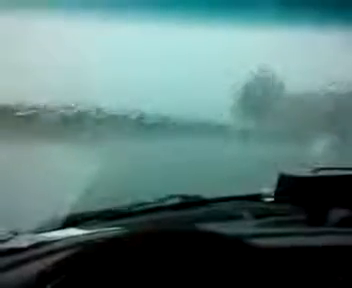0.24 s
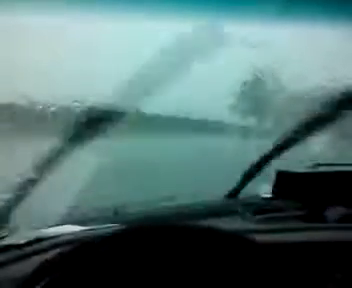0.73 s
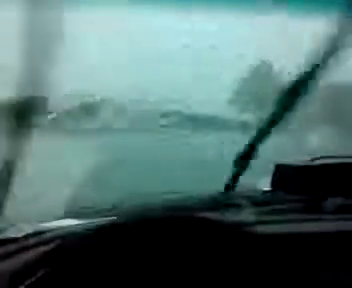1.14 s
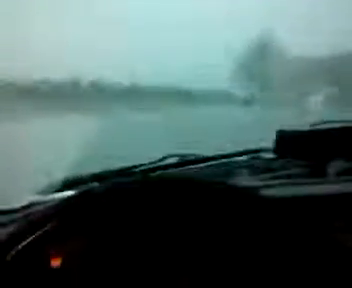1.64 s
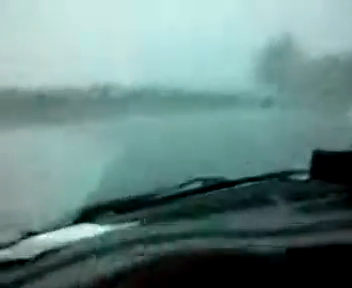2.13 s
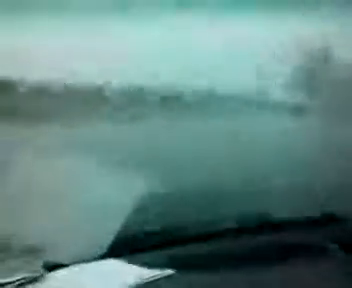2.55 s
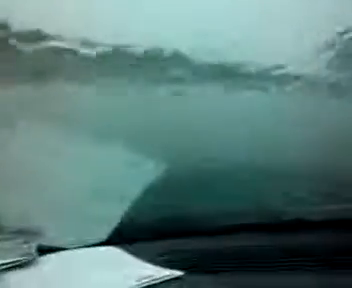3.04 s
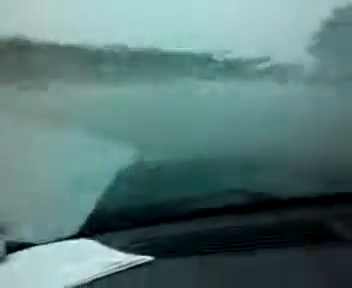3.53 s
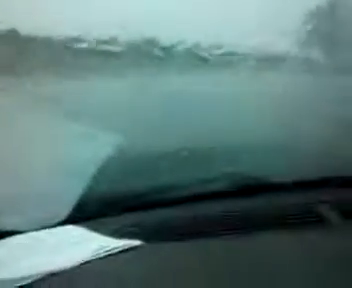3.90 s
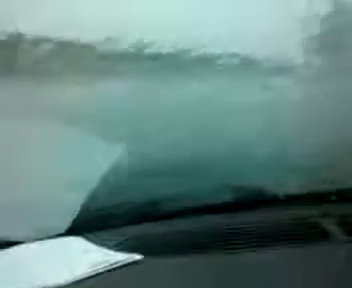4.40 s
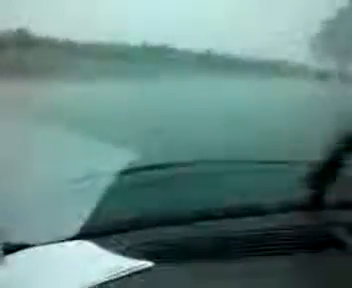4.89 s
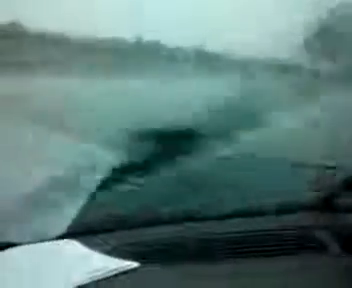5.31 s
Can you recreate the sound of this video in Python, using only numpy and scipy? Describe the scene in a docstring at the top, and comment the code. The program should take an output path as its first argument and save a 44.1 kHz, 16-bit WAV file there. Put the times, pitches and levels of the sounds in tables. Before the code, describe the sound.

Hail clatters on a car roof and windshield from the first instant, heard close from inside the cabin. A dense patter of small stones swells and dips with the gusts, giving hollow midrange knocks on the metal and sharper taps on the glass. Bigger stones land in quick clumps and make the panels ring very briefly. Single heavy stones crack through, notably around 0.1, 0.6 and 1.7 seconds and repeatedly between 2.5 and 3 seconds, the loudest overloading into bright ticks. Just after 3 seconds the hail eases briefly, with another burst near 3.6 seconds. From about 4 seconds low thumps of the car body stand out, strongest around 4.3 seconds, and the clatter runs on to the end at about 5.6 seconds. The sound has the narrow, slightly dull quality of a phone microphone with little treble.

```python
"""Hail on a parked car, heard from the cabin, close under roof and windshield, on a narrow-band phone mic.
From the start a dense patter swells with the gusts; bigger stones land in clumps and set panels ringing,
and single heavy stones crack, the loudest overloading the recorder into bright ticks.
Just after 3 s the hail eases briefly; from about 4 s low thumps of the car body stand out,
and the clatter runs on to the end."""
import sys
import numpy as np
from scipy import signal
from scipy.io import wavfile
from scipy.ndimage import uniform_filter1d

SR = 44100
rng = np.random.default_rng(int(sys.argv[2]) if len(sys.argv) > 2 else 0)


def bounce(signal):
    """Save signal as a 16-bit WAV file at the path given by the first command-line argument."""
    frames = np.transpose(np.atleast_2d(signal))
    limited = np.clip(frames, -1, 1)
    pcm = np.round(limited * 32767).astype(np.int16)
    wavfile.write(sys.argv[1], SR, pcm)


N = 244755

# Gusts driving the hail: t/s, roof level/dB, glass over roof/dB, body thump over roof/dB, roof ring f/Hz
GUSTS = [(0.0, -17, -10.5, -7, 632), (0.3, -18.5, -7.5, -6, 595), (0.6, -17.5, -6.5, -3.5, 763),
         (0.95, -16.5, -5.5, -6.5, 622), (1.3, -17.5, -9, -5.5, 650), (1.62, -18.5, -10, -9.5, 753),
         (2.0, -19, -10, -3.5, 590), (2.3, -19.5, -10, -10, 617), (2.55, -20.5, -2, -6, 648),
         (3.0, -17.5, -8, -11.5, 570), (3.2, -28, -6, 3.5, 570), (3.351, -21, -10, -8, 650),
         (3.54, -24.5, -10.5, -5, 604), (3.72, -15, -9, -9, 516), (4.05, -23.5, -3, -4.5, 590),
         (4.42, -17, -1.5, -2, 617), (4.68, -22.5, -11, 5.5, 563), (4.85, -19.5, -10.5, -10, 707),
         (5.2, -18.5, -8.5, -7, 556), (5.55, -18.5, -5.5, -8, 687)]


def heavy_stones(swing, light_count=120):
    """Single stones overhead: a push and a short ring, signed the way the panel already swings."""
    # Heavy stones striking the car: t/s, blow level/dB, ring f/Hz
    heavy = [(0.0181, -1.5, 3240), (0.0965, -2.5, 3280), (0.1355, 5.5, 1480), (0.1409, 3, 1360),
             (0.1522, -14, 870), (0.1605, -6, 760), (0.1658, -5, 750), (0.1714, -6, 720), (0.2197, -9, 790),
             (0.2272, 1, 520), (0.2376, -2.5, 845), (0.3094, 0.0, 1050), (0.3176, 3.5, 1140),
             (0.3251, -2.5, 610), (0.331, -2.5, 550), (0.3397, -14, 530), (0.3586, 4, 580),
             (0.4141, -2, 2940), (0.5762, -2.0, 1050), (0.5812, 0, 960), (0.5939, -1.0, 1210),
             (0.6031, 0, 1100), (0.6133, 5, 1010), (0.6203, 6, 944), (0.6273, 0, 830), (0.6333, 5, 694),
             (0.6482, 0, 516), (0.7167, 1, 3300), (0.7222, -0.5, 2050), (0.7282, 1, 940),
             (0.7511, -1.5, 860), (0.8313, -1, 1160), (0.8373, -2.5, 1020), (0.8444, -14, 960),
             (0.8503, 1, 555), (0.8576, 4, 460), (0.8891, -1.5, 1170), (0.9058, -1, 1450),
             (0.9177, 0, 3380), (0.9259, -0.5, 3340), (0.93, -1.5, 3300), (1.0242, 1, 1240),
             (1.102, 1.5, 2570), (1.1077, 1, 1020), (1.1456, 2, 1170), (1.1541, 0, 654), (1.1621, -7, 1270),
             (1.1721, -11, 970), (1.178, -9, 1010), (1.2138, -5.5, 1390), (1.236, -1.5, 1340),
             (1.2539, -3, 1070), (1.262, -0.5, 325), (1.3426, -1.5, 2730), (1.3495, -1, 930),
             (1.3796, -1, 900), (1.3867, 2, 900), (1.3934, 1, 840), (1.3989, -4, 530), (1.4066, -2, 557),
             (1.4143, 2, 1100), (1.4203, -3, 900), (1.4604, -2.5, 910), (1.4951, 4, 1100),
             (1.5149, 0, 2750), (1.5282, 1.5, 1450), (1.5396, 2, 1040), (1.6549, 1, 1820),
             (1.6738, -2, 870), (1.7318, 2, 970), (1.7373, 5, 1140), (1.7429, 4.5, 1190),
             (1.7478, -2.0, 1240), (1.7556, -6.5, 1260), (1.7617, -3, 1030), (1.7673, 4, 960),
             (1.774, -1, 980), (1.8928, -4, 970), (1.8979, 0.5, 930), (1.9061, 0.0, 940),
             (1.9137, 3.5, 750), (1.9604, 0, 506), (2.0024, -0.5, 690), (2.191, 2, 640), (2.1968, 2.5, 690),
             (2.2028, -5.5, 1700), (2.2098, -6, 2050), (2.2149, -3, 1950), (2.2214, -3.5, 2170),
             (2.2267, -3, 2520), (2.2743, -0.5, 805), (2.4694, 0, 520), (2.4785, -3.5, 574),
             (2.4845, 0.5, 650), (2.4921, -4, 660), (2.497, 2, 704), (2.5068, -1.0, 580), (2.5432, 0, 1430),
             (2.5491, 3, 556), (2.5534, 0.5, 760), (2.5614, 0, 800), (2.5687, -4, 830), (2.5771, -1, 740),
             (2.5822, -3.5, 800), (2.598, 2, 1620), (2.6471, 1.5, 676), (2.6652, -2, 700), (2.67, -4, 785),
             (2.6909, 2, 960), (2.699, 1.0, 1090), (2.7108, -3, 830), (2.7161, -6, 750),
             (2.7241, -3.5, 510), (2.7457, -4.5, 510), (2.7572, -6, 430), (2.7902, -1, 750),
             (2.7987, 1, 780), (2.8053, 1, 820), (2.8351, -3, 730), (2.8503, -2.0, 840), (2.8555, 1, 830),
             (2.8963, -1, 780), (2.9078, 2, 820), (2.9138, -6, 540), (2.93, -2, 755), (2.9395, -11, 790),
             (2.948, -2, 330), (2.9651, -5.5, 420), (2.9869, -3, 705), (3.0267, 4.5, 900),
             (3.0404, -10, 670), (3.0484, 2, 820), (3.0589, -3.0, 540), (3.0678, -1, 550),
             (3.4089, -2, 673), (3.587, -2, 1040), (3.6007, 2.5, 1050), (3.6483, -11, 440),
             (3.6554, 3.5, 1320), (3.6611, 0, 477), (3.6678, -3, 680), (3.6786, -4, 570), (3.696, -8, 530),
             (3.7697, -6, 560), (4.0852, 1, 1460), (4.0949, -14, 660), (4.1192, 0, 1290),
             (4.1691, -1, 1420), (4.1816, -2.5, 1320), (4.2742, 1, 330), (4.3103, -5.5, 2190),
             (4.3163, 0.5, 2120), (4.3215, 4, 950), (4.3276, -2.0, 440), (4.3386, -3, 740),
             (4.3648, 1, 765), (4.3723, 5, 794), (4.3928, -1, 2930), (4.3974, -7.5, 3030),
             (4.4148, -4, 2660), (4.4283, 0.5, 2600), (4.4351, 3, 330), (4.4401, -5, 1700),
             (4.4518, -11, 1720), (4.4602, -10, 1110), (4.4821, 2.5, 1060), (4.5241, -4, 600),
             (4.7851, -0.5, 2140), (4.83, -7, 1070), (4.8407, -3, 710), (4.8503, 0, 1150),
             (4.8829, -1.5, 520), (4.89, -1, 520), (4.907, 2, 2450), (4.9242, -3, 1970),
             (5.0275, -4.5, 860), (5.0449, -0.5, 840), (5.0556, -2, 590), (5.1564, -3.5, 1030),
             (5.1682, -0.5, 850), (5.174, 3, 570), (5.2926, -2, 1880), (5.3132, -2, 510), (5.3575, -4, 530),
             (5.3631, -1, 500), (5.4088, -1, 2050)]
    out, t = np.zeros(N), np.arange(-40, 400) / SR
    push = np.exp(-(t / 0.00014) ** 2)
    fade = np.where(t < 0, np.exp(-(t / 0.00071) ** 2), np.exp(-t / 0.0019))
    # Lighter stones fall at random, 10 to 13 dB over the roof level of the gust.
    when, pitch, size = rng.random((light_count, 3)).T
    when = when * N / SR
    gust_s, roof_db = np.transpose(GUSTS)[:2]
    light_db = np.interp(when, gust_s, roof_db) + 13 - 3 * size
    light = np.transpose([when, light_db, 400 * 8 ** (pitch ** 2.5)])
    for s, db, hz in np.vstack([heavy, light]):
        sign = np.sign(swing[min(round(s * SR), N - 1)])
        crack = 0.48 * push + 0.3 * fade * np.cos(2 * np.pi * hz * t)
        add(out, s + t[0], sign * gain_of(db) * crack)
    return out


def patter(patch_s=0.029):
    """Small stones fall without pause, in patches; the ring drifts as gusts move them over the roof."""
    s, *columns = np.transpose(GUSTS)
    roof_db, glass_db, thump_db, roof_hz = (np.interp(np.arange(N) / SR, s, c) for c in columns)
    patches = wander(rng.standard_normal((3, N)), round(patch_s * SR))
    patch_db = np.array([[4], [2], [3]]) * patches
    body, roof, glass = hail(spread_db=4, sleet=0.23, own=0.76) * gain_of(patch_db)
    body = gain_of(thump_db) * panel_ring(body, hz=132, width_hz=69, share=0.12)
    roof = panel_ring(roof, roof_hz, width_hz=440, share=0.33)
    return gain_of(roof_db) * (roof + gain_of(glass_db) * glass + body)


def flurries():
    """Clumps of bigger stones start fast, hold and die away; the glass falls silent before the roof."""
    # Clumps landing: t/s, roof level/dB, roof ring f/Hz, glass over roof/dB, glass ring f/Hz,
    # body thump over roof/dB, length/s
    clumps = [(0.008, -26, 1000, 8, 3240, -4, 0.028), (0.091, -23.5, 1220, 7, 3240, -16, 0.036),
              (0.132, -17.5, 744, 1, 1430, -15, 0.043), (0.207, -9.5, 762, -13, 1390, -14, 0.026),
              (0.269, -18.5, 480, -2, 1420, -14, 0.092), (0.304, -21.5, 550, -16, 2210, -10.5, 0.05),
              (0.403, -24.5, 460, 10, 2930, -26, 0.0074), (0.43, -18, 710, -3, 2900, -25, 0.021),
              (0.48, -17.5, 710, 1.5, 3310, -18, 0.017), (0.569, -21, 1000, 1.5, 1390, -28, 0.055),
              (0.612, -16.5, 890, -25, 2050, -8, 0.058), (0.701, -22, 1020, 1, 2070, -16, 0.024),
              (0.749, -17.5, 880, -9, 2090, -10, 0.016), (0.804, -19, 900, 3.5, 1700, -18, 0.049),
              (0.856, -23, 458, 1.5, 1450, -4, 0.055), (0.918, -14.5, 1225, 1.5, 3490, -18, 0.013),
              (0.96, -18.5, 517, -10, 1710, -10, 0.0085), (1.022, -17, 1110, 1, 1410, -18, 0.02),
              (1.088, -17, 980, 1, 1410, -1, 0.015), (1.138, -16, 485, -2.5, 2070, -15, 0.049),
              (1.199, -15.5, 304, -3.5, 1420, -16, 0.045), (1.315, -18.5, 940, 1, 2050, -19, 0.052),
              (1.384, -16, 511, 0, 2764, -5.5, 0.038), (1.464, -18, 405, -0.5, 1500, -4, 0.032),
              (1.514, -16, 840, 1.5, 1400, -7, 0.023), (1.565, -16, 410, -20, 1410, -26, 0.017),
              (1.595, -17, 830, -8, 1690, -21, 0.013), (1.644, -17, 870, -5, 1850, -23, 0.045),
              (1.713, -16, 1150, -1.5, 1400, -26, 0.068), (1.881, -17, 960, -0.5, 2790, -9, 0.035),
              (1.937, -13.5, 490, -8.5, 1410, -15, 0.018), (1.987, -16, 740, -22, 3070, -29.5, 0.028),
              (2.051, -21, 480, -2, 1400, -16, 0.019), (2.069, -21.5, 405, -8.5, 1810, -12, 0.011),
              (2.108, -21, 900, 2, 3310, 2, 0.025), (2.181, -15.5, 451, 1, 1990, -11, 0.054),
              (2.249, -17.5, 746, -4, 1630, -25, 0.046), (2.362, -18.5, 660, -4, 1520, -20.5, 0.023),
              (2.424, -16.5, 654, -8, 1500, -18, 0.021), (2.455, -14.5, 607, -5, 1670, -15, 0.058),
              (2.526, -15.5, 748, -2, 1690, -5, 0.072), (2.62, -19.5, 765, -5, 3030, -13, 0.0088),
              (2.654, -18, 645, -1.5, 1580, -23, 0.032), (2.695, -11.5, 780, -5.5, 2550, -23, 0.021),
              (2.743, -14.5, 595, -9.5, 1990, -10, 0.034), (2.776, -14.5, 770, -9, 1400, -20, 0.031),
              (2.832, -18, 830, 3, 1500, -9, 0.035), (2.884, -13, 650, -4, 1650, -5.5, 0.05),
              (2.974, -14, 397, -6, 2310, -10, 0.035), (3.016, -19.5, 644, 0.5, 1740, -21, 0.038),
              (3.069, -19, 552, -12, 1400, -11, 0.04), (3.123, -18.5, 533, -0.5, 1550, -18, 0.029),
              (3.178, -22.5, 1050, 0, 3040, -9, 0.012), (3.264, -19, 572, -0.5, 3450, -22, 0.044),
              (3.377, -21, 654, -0.5, 2740, -21.5, 0.037), (3.426, -25.5, 530, 5.5, 1730, -19, 0.029),
              (3.571, -18, 1092, 0.5, 1790, -11, 0.039), (3.643, -14, 560, -4, 1440, -16, 0.055),
              (3.732, -16.5, 463, -5, 1550, -3, 0.015), (3.778, -27, 495, -12, 3160, -15, 0.027),
              (3.845, -27, 800, -9, 1570, -16, 0.025), (3.86, -30, 574, 9, 2490, -15, 0.032),
              (3.92, -21.5, 430, 2.5, 1720, -23, 0.032), (3.987, -18.5, 564, -0.5, 1500, -5, 0.029),
              (4.077, -17, 626, 0.5, 1640, -21, 0.041), (4.135, -17, 960, 0.5, 1450, -3.5, 0.051),
              (4.205, -23, 586, -1, 3320, -5, 0.023), (4.25, -25, 300, 4.5, 3300, -5, 0.04),
              (4.304, -15.5, 443, -1, 2210, -3, 0.023), (4.384, -20, 580, 6.5, 2970, -6, 0.013),
              (4.42, -20, 385, 2.5, 1710, 6, 0.037), (4.511, -14.5, 484, -8.5, 1570, -11.5, 0.011),
              (4.593, -29, 300, 3.5, 2780, 1, 0.032), (4.637, -20, 684, -0.5, 3100, -1, 0.025),
              (4.705, -22.5, 310, -4, 1670, -8, 0.054), (4.758, -21, 597, 2.5, 2030, -4, 0.034),
              (4.812, -14, 690, -3.5, 1410, -15, 0.041), (4.867, -16.5, 526, -4, 2300, -20, 0.049),
              (4.915, -20.5, 573, 4, 1740, -1, 0.02), (4.96, -22, 557, -10, 1600, -16, 0.028),
              (4.999, -18.5, 1210, 3, 1420, -14, 0.036), (5.037, -18, 540, -7, 1420, -11, 0.041),
              (5.102, -18.5, 973, -5, 1430, -8, 0.066), (5.161, -14, 550, -23, 1570, -22, 0.024),
              (5.233, -22, 564, -6, 2670, -10, 0.022), (5.27, -21, 650, 5.5, 1850, -15, 0.029),
              (5.343, -12.5, 540, -6, 1410, -18, 0.017), (5.401, -22, 870, 4, 1820, -25, 0.026),
              (5.466, -19, 1110, -2, 1440, -13, 0.06)]
    stones = np.pad(hail(spread_db=3.5, sleet=0.26, own=0.65), ((0, 0), (0, SR // 4)))
    out, t = np.zeros(N), np.arange(SR // 6) / SR
    rise_s = np.array([[0.003], [0.006], [0.008]])  # roof, glass, body
    decay_s = np.array([[0.016], [0.009], [0.025]])
    for s, db, roof_hz, glass_db, glass_hz, thump_db, length in clumps:
        body, roof, glass = stones[:, round(s * SR):][:, :len(t)]
        roof = panel_ring(roof, roof_hz, width_hz=110, share=0.54)
        glass = panel_ring(glass, glass_hz, width_hz=260, share=0.25)
        envelopes = (1 - np.exp(-t / rise_s)) * np.exp(-np.maximum(t - length, 0) / decay_s)
        parts = np.array([roof, glass, body]) * envelopes
        # Each part carries the energy of its blow, however its stones fell.
        trim = np.linalg.norm(envelopes, axis=1) / (np.linalg.norm(parts, axis=1) + 1e-9)
        add(out, s, gain_of(db) * (trim * gain_of([0, glass_db, thump_db])) @ parts)
    return out


def ringing_notes(faint_count=300, waver_depth=0.024):
    """A struck panel or pane builds up a note that wavers, rattles and fades; faint ones come at random."""
    # Notes that stand out of the clatter: t/s, level/dB, f/Hz, length/s
    clear = [(0.0, -15.5, 3390, 0.016), (.16, -14, 734, 0.08), (.304, -18, 172, 0.029),
             (.496, -17, 694, 0.028), (.592, -13, 1109, 0.023), (.71, -20, 3390, 0.021),
             (.833, -24, 928, 0.061), (1.091, -13.5, 176, 0.038), (1.159, -13, 977, 0.019),
             (1.399, -31, 2780, 0.03), (1.5, -20, 2844, 0.031), (1.639, -17, 1880, 0.023),
             (1.658, -18, 845, 0.059), (1.738, -20, 1255, 0.044), (1.878, -18, 958, 0.056),
             (1.976, -11.5, 818, 0.018), (2.11, -18, 3325, 0.014), (2.18, -19, 1700, 0.14),
             (2.185, -21.5, 2690, 0.066), (2.261, -15, 815, 0.02), (2.463, -13, 608, .029),
             (2.562, -19, 3240, .067), (2.564, -15, 760, 0.028), (2.578, -21, 1612, 0.023),
             (2.6, -17, 2950, 0.028), (2.651, -14, 714, 0.021), (2.688, -19, 2000, 0.023),
             (2.73, -10, 432, .019), (2.912, -12.5, 750, 0.028), (2.929, -13.5, 126, 0.026),
             (2.951, -11, 395, 0.027), (3.025, -15, 1667, 0.031), (3.05, -15, 539, 0.028),
             (3.19, -22.5, 3240, 0.017), (3.641, -18, 400, 0.047), (3.767, -13.5, 504, 0.042),
             (4.104, -19.5, 127, 0.069), (4.17, -26, 1504, 0.034), (4.22, -15, 104, 0.024),
             (4.255, -28, 146, 0.036), (4.315, -9.5, 116, .047), (4.37, -12, 80, 0.031),
             (4.429, -26, 174, 0.036), (4.449, -18, 1700, .04), (4.82, -11.5, 1060, 0.023),
             (4.87, -23, 553, 0.018), (5.132, -16, 975, 0.038), (5.218, -7.5, 535, 0.015),
             (5.275, -21, 1931, 0.053), (5.349, -19.5, 546, 0.04)]
    out, t = np.zeros(N), np.arange(SR // 12) / SR
    when, pitch, size = rng.random((faint_count, 3)).T
    faint_hz = 130 * 26 ** pitch
    faint_db = -25 - 10 * size - 7.1 * abs(np.log2(faint_hz / 500))
    faint = np.transpose([when * N / SR, faint_db, faint_hz, np.full(faint_count, 0.037)])
    for s, db, hz, length in np.vstack([clear, faint]):
        noise = rng.standard_normal((2, len(t)))
        waver, rattle = wander(noise, 120)
        phase = 2 * np.pi * np.cumsum(hz * (1 + waver_depth * waver)) / SR + 10 * noise[0, 0]
        swell = t / (0.34 * length) * np.exp(1 - t / (0.36 * length))
        add(out, s, gain_of(db) * swell * (1 + 0.45 * rattle) * np.sin(phase))
    return out


def hail(spread_db, sleet, own, stones_per_s=600):
    """Uneven blows over fine sleet; body, roof and glass share one stream and each catch their own."""
    slot = round(SR / stones_per_s)  # each stream has one blow somewhere in each slot
    starts = np.arange(0, N, slot)
    at = starts + rng.integers(0, slot, (4, len(starts)))
    size = gain_of(spread_db * np.minimum(rng.exponential(1, at.shape), 3))
    blows = np.zeros((4, N + slot))
    np.put_along_axis(blows, at, size * rng.choice([-1, 1], at.shape), axis=1)
    blows = unit_rms(blows[:, :N]) + sleet * rng.standard_normal((4, N))
    caught = blows[0] + own * blows[1:]
    body, roof, glass = signal.oaconvolve(caught, cabin_response()[None], axes=1)[:, :N]
    body_roof_hz, roof_glass_hz = 238.5, 1373
    body = butterworth(body, 2, body_roof_hz, "low")
    roof = butterworth(roof, 2, [body_roof_hz, roof_glass_hz], "band")
    glass = butterworth(glass, 3, roof_glass_hz, "high")
    return np.array([unit_rms(body), unit_rms(roof), unit_rms(glass)])


def panel_ring(x, hz, width_hz, share):
    """The struck patch of panel lends its resonance to a share of the sound."""
    turn = np.exp(2j * np.pi * np.cumsum(hz * np.ones(len(x))) / SR)
    pole = np.exp(-np.pi * width_hz / SR)
    # Shift hz down to zero, smooth, shift back.
    ring = (turn * signal.lfilter([1 - pole], [1, -pole], x / turn + 1e-18)).real
    return unit_rms((1 - share) * unit_rms(x) + share * unit_rms(ring))


def cabin_response():
    """One blow as it arrives at the microphone inside the car: a minimum-phase impulse response."""
    # Response of panels, cabin and microphone together: f/Hz, level/dB
    cabin_curve = [(15, -41.5), (30, -36), (60, -15.5), (119, -4), (218, -0.5), (495, -2.5), (731, -4.5),
                   (1460, -7.5), (2300, -10), (3250, -11), (3550, -18), (3950, -29), (4300, -34.5),
                   (5500, -92)]
    hz, db = np.transpose(cabin_curve)
    bin_hz = abs(np.fft.fftfreq(8192, 1 / SR)) + 1
    log_gain = np.log(gain_of(np.interp(np.log(bin_hz), np.log(hz), db)))
    spectrum = np.exp(np.conj(signal.hilbert(log_gain)))
    return np.fft.ifft(spectrum).real[:4096]


def gain_of(db):
    """Decibels to amplitude."""
    return 10 ** (np.asarray(db) / 20)


def unit_rms(x):
    """Scales to unit rms."""
    return x / np.sqrt(np.mean(x ** 2) + 1e-20)


def wander(noise, span):
    """Smooths noise twice over span samples into a drift of unit rms."""
    return unit_rms(uniform_filter1d(uniform_filter1d(noise, span), span))


def butterworth(x, order, hz, kind):
    """Causal low-, band- or high-pass."""
    return signal.sosfilt(signal.butter(order, hz, kind, fs=SR, output="sos"), x)


def add(mix, s, sound):
    """Mixes a sound in at s seconds."""
    part = mix[max(round(s * SR), 0):][:len(sound)]
    part += sound[:len(part)]


def scene():
    """All the hail from one spot in the cabin, in mono."""
    clatter = patter() + flurries() + ringing_notes()
    return (clatter + heavy_stones(clatter))[None]


def record(dry):
    """The phone: a narrow-band microphone, sharp-kneed overload, faint hiss, then the band limit."""
    mic_low_hz, mic_high_hz, band_limit_hz = 45, 4300, 15850
    ceiling, knee, hiss_db = 0.705, 22, -97
    mic_filter = signal.firwin(151, mic_high_hz, window=("kaiser", 9), fs=SR)
    narrow = signal.oaconvolve(dry, mic_filter[None], "same")
    narrow = butterworth(narrow, 2, mic_low_hz, "high")
    clipped = narrow / (1 + abs(narrow / ceiling) ** knee) ** (1 / knee)
    hiss = gain_of(hiss_db) * rng.standard_normal(dry.shape)
    band_limit = signal.firwin(511, band_limit_hz, window=("kaiser", 9), fs=SR)
    return signal.oaconvolve(clipped + hiss, band_limit[None], "same")


dry = scene()
out = record(dry)
bounce(out)
```